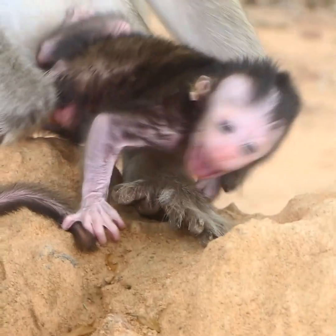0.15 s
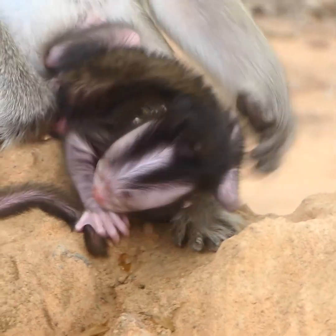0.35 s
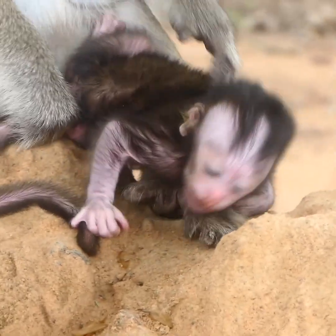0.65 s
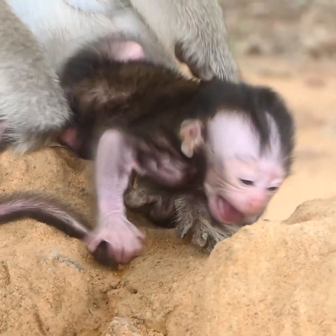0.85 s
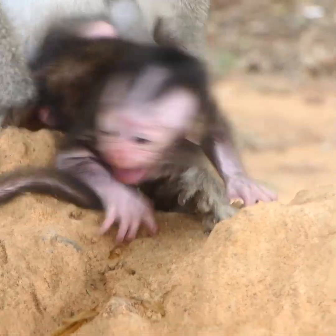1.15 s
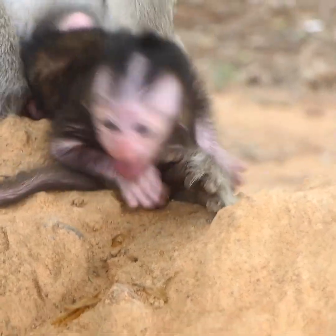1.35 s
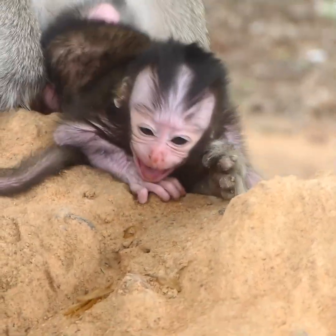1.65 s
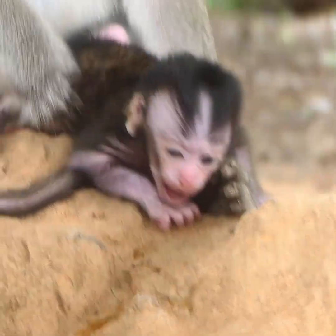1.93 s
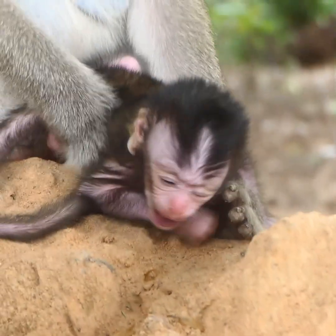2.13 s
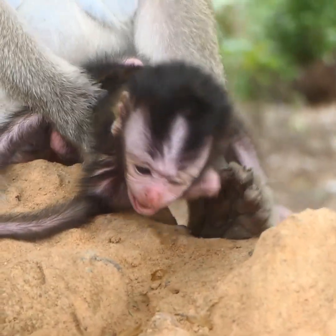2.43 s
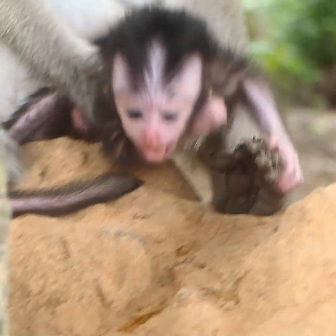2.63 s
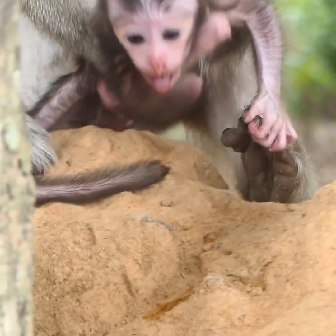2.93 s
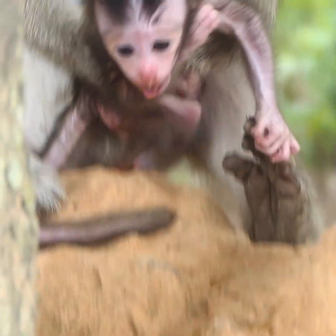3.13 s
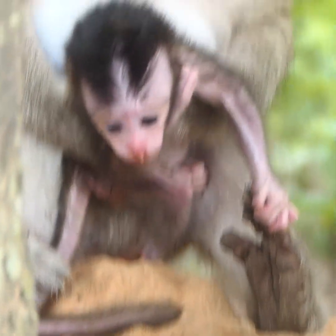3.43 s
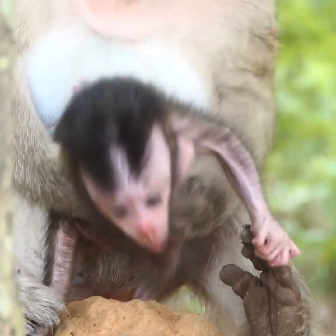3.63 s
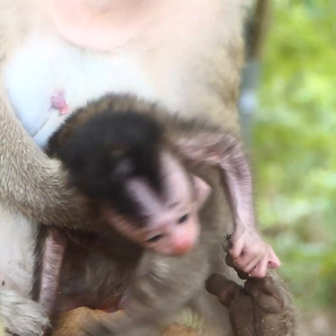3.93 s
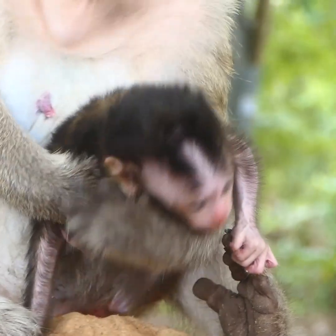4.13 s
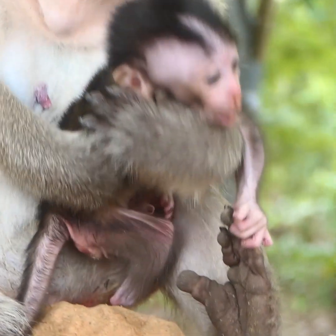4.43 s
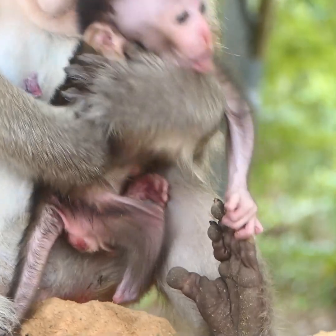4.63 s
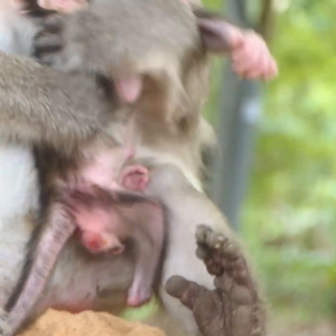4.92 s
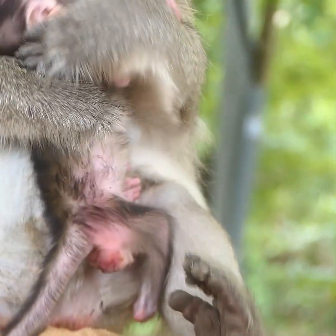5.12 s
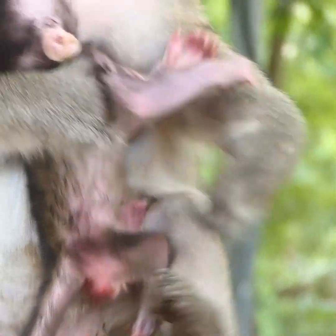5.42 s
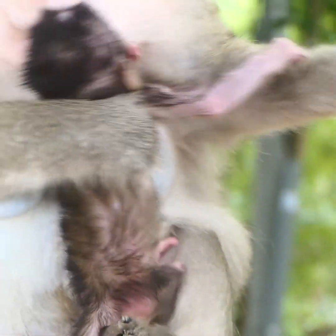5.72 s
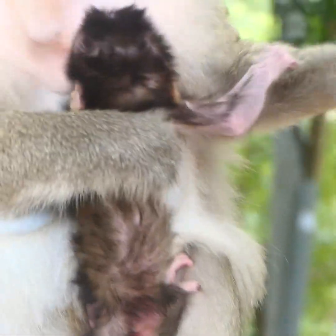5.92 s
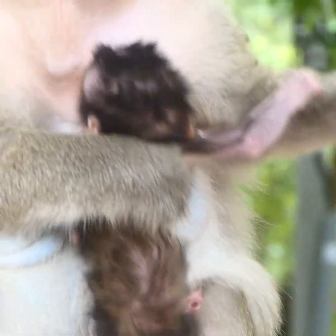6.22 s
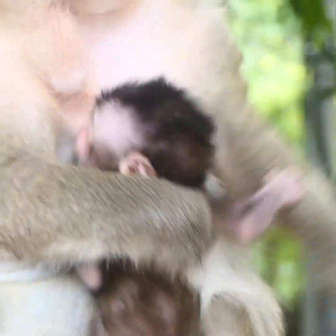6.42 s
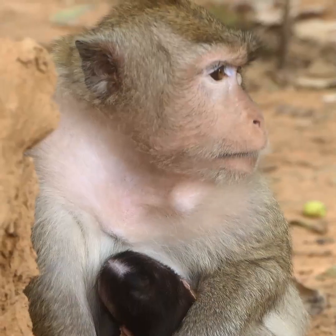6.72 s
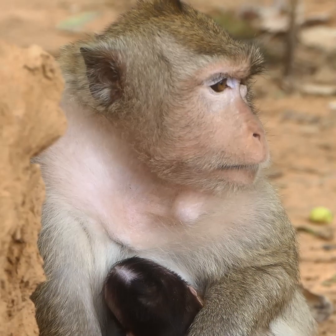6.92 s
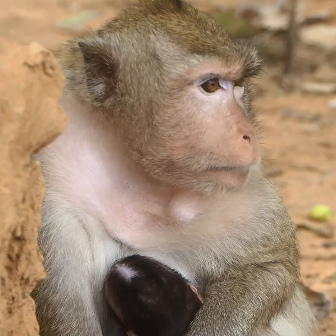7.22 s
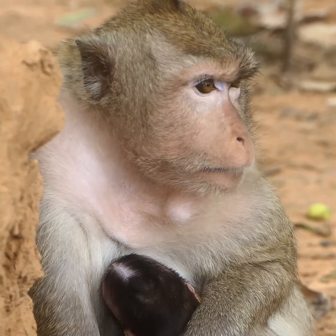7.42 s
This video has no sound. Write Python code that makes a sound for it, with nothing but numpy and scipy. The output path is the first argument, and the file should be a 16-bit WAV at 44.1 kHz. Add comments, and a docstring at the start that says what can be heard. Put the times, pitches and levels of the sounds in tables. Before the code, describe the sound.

A baby monkey shrieks close by, outdoors, right from the start: a very high whistle that cracks into rasp and lasts about half a second. A second, longer shriek runs from about 1 to 1.8 seconds. The third, from about 2.5 to 2.9 seconds, splits into several tones and slides steeply down. Behind the cries, much quieter, a distant one-cylinder engine chugs slowly with a dull thump, loose clatter and faint hiss. It swells between 3 and 4.5 seconds, then recedes and slows slightly. Near 5.4 seconds a monkey gives one soft huff, followed by faint scuffs of fur until about 6 seconds. At 6.6 seconds everything cuts to silence. Just before 6.9 seconds the engine returns, faster and brighter, and fades until the end at around 7.7 seconds.

```python
"""A baby macaque shrieks three times close by, outdoors: a very high whistle from its vocal folds that breaks
into rasp and, in the last cry, splits into side tones. Far off, a slow one-cylinder engine chugs as each firing
rings its exhaust. A short huff and some scuffs follow as the baby is gathered up. After a moment of silence the
scene changes: an engine runs faster and brighter, fading away."""
import sys
import numpy as np
from scipy import signal
from scipy.fft import rfft, irfft
from scipy.io import wavfile
from scipy.ndimage import uniform_filter1d, minimum_filter1d

SR = 44100
rng = np.random.default_rng(int(sys.argv[2]) if len(sys.argv) > 2 else 0)


def wav_record(signal):
    """Record a signal, one row per channel, as 16-bit PCM in the file named by sys.argv[1]."""
    frames = np.transpose(np.atleast_2d(signal))
    bounded = np.clip(frames, -1, 1)
    # unit amplitude maps onto the largest positive 16-bit level
    quanta = np.round(bounded * 32767).astype(np.int16)
    wavfile.write(sys.argv[1], SR, quanta)


N = 333396
TIME = np.arange(N) / SR
FREQ = np.maximum(np.fft.rfftfreq(2 * N, 1 / SR), 1)
SILENCE_START_S, SILENCE_END_S = 6.61, 6.873
CRACKS_PER_S = 220  # how often a rough voice jumps in pitch


def amp(db):
    """Turn decibels into a number to multiply by."""
    return 10 ** (np.asarray(db) / 20)


def unit(x):
    """Scale a sound to an average power of 1."""
    return x / np.sqrt(np.mean(x ** 2))


def curves(table):
    """One curve for each column after time, joining the rows with straight lines."""
    times, *columns = np.transpose(table)
    return [np.interp(TIME, times, column) for column in columns]


def shape(x, response):
    """Turn each frequency up or down; the result has power 1."""
    return unit(irfft(rfft(x, 2 * N) * response)[..., :N])


def colour(x, points):
    """Shape a sound by (frequency [Hz], level [dB]) points, falling away beyond both ends."""
    hz, db = np.transpose(points)
    gain = amp(np.interp(np.log(FREQ), np.log(hz), db))
    return shape(x, gain * np.minimum(FREQ / hz[0], 1) ** 3 * np.minimum(hz[-1] / FREQ, 1) ** 6)


def ring(x, modes):
    """Pass a sound through resonances: the pitches at which a hollow space likes to ring."""
    response = sum(amp(db) / (1 + 1j * (FREQ / hz - hz / FREQ) * hz / width) ** 2
                   for hz, width, db in modes)
    return shape(x, response)


def low_pass(x, hz):
    """Cut the treble steeply above hz."""
    return signal.sosfilt(signal.ellip(12, .2, 70, hz, fs=SR, output="sos"), x)


def wander(hz):
    """A smooth random wobble of size about 1, mostly slower than hz."""
    smoothing = signal.butter(2, min(hz, SR / 3), fs=SR, output="sos")
    return unit(signal.sosfilt(smoothing, rng.standard_normal(N)))


def jumps(hz):
    """A random value that jumps about hz times a second."""
    return rng.standard_normal(N)[np.cumsum(rng.random(N) < hz / SR)]


def turns(hz):
    """How far a vibration has turned so far (its phase), in radians."""
    return 2 * np.pi * np.cumsum(hz) / SR


def band(hz, width):
    """A narrow band of noise around a pitch that may move."""
    smoothing = signal.butter(3, width / 2, fs=SR, output="sos")
    a, b = signal.sosfilt(smoothing, rng.standard_normal((2, N)))
    phase = turns(hz)
    return unit(a * np.sin(phase) + b * np.cos(phase))


def wide_noise(side):
    """Noise for two ears; a larger side makes them less alike."""
    mid, apart = rng.standard_normal((2, N))
    return np.array([mid + side * apart, mid - side * apart])


def swells(source, table):
    """Smooth rises and falls of a sound, each in its own band."""
    return sum(ring(source, [(hz, width, 0)]) * amp(db) * np.exp(-((TIME - peak) / length) ** 2)
               for peak, length, db, hz, width in table)


def envelope(start, end, attack_s=.014, release_s=.024):
    """Fade one call in, hold it, and fade it out."""
    return np.clip(np.minimum((TIME - start) / attack_s, (end - TIME) / release_s), 0, 1)


def outdoors(x, echo_s, wet_db):
    """Add thin echoes from ground and trees, different at each ear."""
    t = TIME[:SR // 2]
    tail = rng.standard_normal((2, len(t))) * amp(-60 * t / echo_s) * (t > .003)
    tail /= np.sqrt(np.sum(tail ** 2, axis=1, keepdims=True))
    return x + amp(wet_db) * signal.fftconvolve(np.atleast_2d(x), tail, axes=1)[:, :N]


def monkey():
    """Vocal folds whistle; pushed harder they shake unevenly, so the pitch cracks and the voice rasps."""
    # the course of each cry: (time [s], pitch [Hz], roughness [0-1])
    first_cry = [(-.02, 5510, 0.6), (.03, 6130, 0.86), (.06, 6405, .5), (.074, 7390, .62),
                 (.118, 7900, .48), (.15, 7596, 0.54), (.2, 8050, 0.48), (.25, 8020, 0.66),
                 (.285, 8270, 0.45), (.31, 8200, 0.2), (.333, 7790, .42), (.337, 5470, .72),
                 (.372, 5870, 0.7), (.392, 7150, .62), (.411, 6680, 0.3), (.42, 6490, 1.22),
                 (.442, 5450, 0.88), (.49, 7070, 0.9), (.528, 6370, 1.11)]
    second_cry = [(0.977, 6545, 0.43), (0.99, 5800, 0.11), (1.001, 6150, 0.19), (1.008, 6770, 0.52),
                  (1.03, 6424, 0.83), (1.053, 8230, 0.51), (1.103, 8410, 0.43), (1.154, 7820, 0.11),
                  (1.174, 7720, 0.45), (1.217, 6900, 0.39), (1.226, 8150, 0.2), (1.258, 8540, 0.51),
                  (1.284, 8450, 0.89), (1.39, 8550, 0.94), (1.422, 8300, 0.5), (1.46, 8000, 0.46),
                  (1.501, 7640, 0.57), (1.56, 6950, .36), (1.578, 7530, 0.28), (1.592, 7360, 0.46),
                  (1.611, 7960, 0.1), (1.632, 7260, 0.45), (1.664, 6850, 0.25), (1.712, 6900, 0.36),
                  (1.737, 7600, 0.36), (1.762, 6620, 0.11), (1.783, 5050, 0.44)]
    last_cry = [(2.558, 5066, 0.07), (2.596, 5156, 0.057), (2.609, 5530, 0.27), (2.624, 5166, 0.1),
                (2.656, 5840, .08), (2.686, 5950, .14), (2.706, 5134, .28), (2.736, 5180, 0.099),
                (2.748, 4665, 0.42), (2.762, 4600, 0.52), (2.771, 4600, 0.14), (2.784, 4500, 0.18),
                (2.791, 4428, .5), (2.803, 4378, 0.14), (2.83, 4187, .14), (2.847, 3750, 0.47),
                (2.863, 2810, 0.53), (2.878, 2380, 0.32), (2.891, 2320, .4)]
    # how hard the baby pushes: (time [s], level [dB])
    effort = [(0, -33), (.24, -33), (.315, -28.5), (.36, -36), (.405, -31.5), (.46, -37.5), (.53, -35.5),
              (.99, -31.5), (1.03, -31), (1.1, -35.5), (1.15, -30), (1.22, -28), (1.32, -36), (1.42, -29.5),
              (1.52, -31), (1.67, -26.5), (1.728, -34.5), (1.755, -21.5), (1.785, -25), (2.56, -30),
              (2.62, -30.5), (2.65, -25.5), (2.75, -25.5), (2.88, -25.5)]
    hz, rough = curves(first_cry + second_cry + last_cry)
    rough = np.clip(rough * (1 + .2 * wander(45)), .01, 1)
    effort_db, = curves(effort)
    sounding = sum(envelope(cry[0][0], cry[-1][0]) for cry in (first_cry, second_cry, last_cry))
    flutter_db = 1.6 * (1 - rough) * wander(70)
    loudness = sounding * amp(effort_db + flutter_db)
    waver = .004 * wander(120)
    cracks = rough * (.03 * wander(600) + .05 * jumps(CRACKS_PER_S) * rough ** .5)
    phase = turns(hz * (1 + waver + cracks))
    whistle = np.sqrt(2) * (np.sin(phase) + side_tones(phase, rough)) * amp(4 * rough * wander(250))
    smear = band(hz * (1 + .05 * rough * wander(70)), width=800)  # uneven cycles blur the pitch
    tone = np.maximum(1 - 1.35 * rough ** 2, 0) * whistle + .62 * rough * smear
    strain_db = .014 * np.maximum(hz - 8250, 0)  # the voice thins at the top of its range
    voice = tone * amp(-strain_db) + .5 * rasp(hz, rough)
    cries = steady_lungs(voice * bursts(rough)) * loudness + thin_whistles()
    near = outdoors(cries, echo_s=.047, wet_db=-7.5)
    trees = outdoors(cries, echo_s=.54, wet_db=-15.5) - cries
    return (near + trees) * amp([[-.2], [.2]])  # a touch louder on the right


def rasp(hz, rough):
    """Swirling air rings the drifting resonances of throat and mouth, now one and now another the most."""
    # throat and mouth resonances: (centre [Hz], width [Hz], level [dB], exponent on roughness)
    throat = [(2910, 420, -5, 2.2), (5365, 790, 0, 1.6), (6240, 820, -2.5, 1.28), (7100, 1100, -0.5, 1.4),
              (8220, 670, -5, 1.8), (8580, 700, -7, 0.93)]
    # one more comes and goes as the mouth moves: (time [s], centre [Hz], level [dB])
    mouth = [(0, 3910, -4), (.12, 4020, -11), (.22, 3750, -10), (.29, 3730, -20), (.38, 3907, -3),
             (.48, 4150, -4.5), (1.04, 4184, -13), (1.2, 3900, -14.5), (1.32, 4185, -4), (1.4, 4195, 2),
             (1.48, 4265, 3.5), (1.54, 4446, -8.5), (1.6, 4700, -24), (1.78, 4500, -22), (2.75, 3869, 2)]
    mouth_hz, mouth_db = curves(mouth)
    air = amp(-11.5) * rough ** 2 * ring(rng.standard_normal(N), [(5800, 3000, 0)])
    for centre, width, db, exponent in throat + [(mouth_hz, 940, mouth_db, .96)]:
        reach = np.minimum(1, 1.4 * hz / centre) ** 3  # resonances far above the pitch get little energy
        drift, shift_db = 1 + .022 * wander(14), 2.2 * wander(22)
        air = air + band(centre * drift, width) * amp(db + shift_db) * rough ** exponent * reach
    return air


def bursts(rough, rate_hz=400):
    """A rough voice comes in rapid, uneven bursts, each starting sharply and fading."""
    cycle = np.cumsum(rate_hz * np.exp(.35 * jumps(rate_hz))) / SR
    fade_db = 13 * rough * (cycle % 1)
    return uniform_filter1d(amp(-fade_db), size=16)


def steady_lungs(x, window_s=.021):
    """Steady pressure from the lungs keeps the power of the voice even."""
    return x / np.sqrt(uniform_filter1d(x ** 2, size=int(window_s * SR)) + 1e-9)


def slow_engine():
    """Distant firings ring the exhaust; the moving parts clatter loosely in step with them."""
    # engine speed: (time [s], firing rate [Hz])
    speed = [(0, 25.38), (1.9, 25.44), (3.15, 24.93), (3.45, 24.56), (4.04, 23.89), (5.02, 23.37),
             (6.6, 23.23)]
    # the engine grows and recedes: (time [s], rise and fall [dB], level of the low thump [dB])
    course = [(0, -13, -50.5), (1.8, -9, -51.5), (2.4, -3, -46), (3.2, -1, -45), (3.8, -0.5, -40),
              (4.6, -0.5, -45.5), (5.5, -6.5, -45.5), (6.6, -9.5, -46)]
    # its other parts, by name: (base level [dB], share of the rise and fall it follows [0-1])
    parts = {"boom": (-49, 0.69), "pipe": (-50, 1), "clatter": (-43, 0.67), "hiss": (-48, 0.83)}
    # exhaust resonances, low to high: (centre [Hz], width [Hz], relative level [dB])
    boom_modes = [(49.3, 4.2, 1), (70.3, 6, -13.5)]
    thump_modes = [(92.6, 60, 7), (125.6, 58.3, 7.5), (194, 40, -4)]
    pipe_modes = [(383.4, 43, 7.5), (444.3, 36, 11.5), (750, 240, -16.5)]
    # tone of the clatter and of the open-air hiss: (frequency [Hz], relative level [dB])
    clatter_tone = [(200, 5), (300, -3.5), (400, 0.5), (600, -3), (780, -0.5), (1050, -4.5), (1500, -5),
                    (2100, -8), (3000, -15)]
    hiss_tone = [(1500, -8.5), (2300, -2.5), (3600, -2), (4800, -5.5), (6200, -8), (7500, -17),
                 (9300, -29.5)]
    # swells of distant noise: (peak time [s], length [s], level [dB], centre [Hz], width [Hz])
    far_swells = [(2.421, 0.42, -50, 462, 60), (3.162, 0.21, -44, 950, 480), (3.787, 0.35, -43.5, 395, 80),
                  (3.822, 0.22, -44.5, 546, 128), (4.05, 0.26, -53.5, 200, 60),
                  (4.443, 0.42, -44.5, 726, 300), (4.297, 0.22, -51, 1950, 900)]
    hz, = curves(speed)
    engine_db, thump_db = curves(course)
    gain = {part: amp(db + share * engine_db) for part, (db, share) in parts.items()}
    blows, gush = firings(hz, scatter_db=1.3, gas=.36)
    boom = ring(blows, boom_modes) * gain["boom"]
    thump = ring(blows, thump_modes) * amp(thump_db)
    # from afar the higher resonances arrive smeared by echoes
    far = outdoors(blows, echo_s=.51, wet_db=-5) + .8 * wide_noise(.25)
    pipe = ring(far, pipe_modes) * gain["pipe"]
    rattle = wide_noise(.2) * (1 + .27 * gush) * amp(.75 * wander(10))
    clatter = colour(outdoors(rattle, echo_s=.095, wet_db=-3.5), clatter_tone) * gain["clatter"]
    hiss = colour(wide_noise(.39) * amp(.66 * wander(25)), hiss_tone) * gain["hiss"]
    return boom + thump + pipe + clatter + hiss + swells(wide_noise(.21), far_swells)


def firings(hz, scatter_db, gas, decay_cycles=.6):
    """Each firing is a pressure pulse and a gush of gas; returns their sound and the gush's strength."""
    cycle = np.cumsum(hz) / SR
    size = amp(scatter_db * wander(32))
    pulses = unit(np.diff(np.floor(cycle), prepend=0) * size)
    gush = unit(np.exp(-(cycle % 1) / decay_cycles) * size)
    return pulses + gas * gush * wide_noise(.36), gush


def thin_whistles():
    """Soft, gliding tones before, beside or after a cry; the rough ones blur into narrow noise."""
    # whistles: (start [s], length [s], pitch [Hz], glide [Hz/s], level [dB], roughness [0-1])
    glides = [(0.107, 0.16, 7180, -7500, -36.5, 0.62), (0.51, 0.064, 5970, -8000, -34, 0.4),
              (.548, 0.103, 5740, 2.5, -53, 0.7), (1.195, 0.068, 5184, -4.5, -37, 0.42),
              (1.288, 0.092, 5240, 305, -41, 0.88), (1.526, 0.061, 5220, 501.5, -34.5, 0.3),
              (1.634, 0.057, 5316, 1.5, -44, .4), (2.443, 0.14, 4767, 1100, -41.5, .06),
              (2.538, 0.028, 4980, 8999, -27, 0.08), (2.843, 0.043, 6650, -22000, -29, 0.34)]
    total = 0
    for start, length, hz, glide, db, rough in glides:
        pitch = (hz + glide * (TIME - start)) * (1 + .002 * wander(60) + .015 * rough * wander(150))
        tone = (1 - rough) * np.sqrt(2) * np.sin(turns(pitch)) + rough * band(pitch, width=600)
        total = total + unit(tone) * amp(db) * envelope(start, start + length, release_s=.059)
    return total * amp(.58 * wander(80))


def scuffs():
    """Small huffs, smacks and scuffs of fur: short swells of grainy noise."""
    # each swell: (peak time [s], length [s], level [dB], centre [Hz], width [Hz])
    touches = [(0.955, 0.0034, -39.5, 2690, 1515), (0.964, 0.011, -47.5, 6130, 2510),
               (5.537, 0.12, -49.5, 3394, 1400), (5.562, 0.014, -44, 2850, 600),
               (5.564, 0.021, -52, 5870, 696), (5.933, 0.0039, -52, 6000, 1410)]
    return swells(wide_noise(.3) * amp(2.2 * wander(150)), touches)


def side_tones(phase, rough):
    """Mainly in the last cry, a second, slower vibration adds tones above and below the whistle."""
    # the second vibration: (time [s], rate [Hz], depth [0-1])
    second_voice = [(2.603, 1055, 0.04), (2.611, 1091, 0.28), (2.632, 1357, 0.22), (2.68, 1590, 0.48),
                    (2.71, 1646, 0.14), (2.733, 1267, 0.37), (2.753, 950, 0.95), (2.78, 1078, 0.8),
                    (2.81, 1042, 0.4), (2.845, 780, 0.3), (2.865, 705.6, 0)]
    # its tones: (distance from the pitch [multiples of that rate], level [dB])
    neighbours = [(-2, -19), (-1, -4), (1, -6), (2, -14), (3, -18.5)]
    rate, depth = curves(second_voice)
    beat = turns(rate * (1 + .015 * wander(600) + .6 * rough ** 2 * jumps(CRACKS_PER_S)))
    tones = sum(amp(db + 2.5 * wander(70)) * np.sin(phase + round(k) * beat) for k, db in neighbours)
    creak = .44 * depth * wander(210) * np.sin(phase)  # it also makes the whistle flutter
    leaking_air = amp(-24) * np.sqrt(depth) * ring(rng.standard_normal(N), [(7960, 4500, 0)])
    return depth * amp(2 * rough) * tones + creak + leaking_air


def huff(peak_s=5.366, length_s=.031, level_db=-34.5):
    """One soft, round puff of air through a monkey's throat."""
    # throat resonances: (centre [Hz], width [Hz], relative level [dB])
    throat = [(1160, 290, -8), (1385, 320, 0), (1650, 110, -2), (2730, 610, -14), (5940, 580, -21)]
    return ring(wide_noise(.58), throat) * amp(level_db) * np.exp(-((TIME - peak_s) / length_s) ** 2)


def fast_engine(start_hz=30.28, slowing_hz_per_s=.3):
    """Quicker firings ring the exhaust under a brighter clatter, and both fade away."""
    # exhaust resonances: (centre [Hz], width [Hz], relative level [dB])
    thump_modes = [(165, 200, 0), (182, 24, -5), (272, 16, -2)]
    # tone of the clatter and hiss: (frequency [Hz], relative level [dB])
    clatter_tone = [(130, 7), (400, 1), (600, -10.5), (870, 1), (1080, -1.5), (1250, 1.5), (1700, -7.5),
                    (3200, -6.5), (4800, -13.5), (7000, -17), (9800, -17.5), (12000, -25), (15000, -39)]
    elapsed = np.maximum(TIME - SILENCE_END_S, 0)
    blows, gush = firings(start_hz - slowing_hz_per_s * elapsed, scatter_db=.5, gas=.2)
    thump = ring(blows, thump_modes) * amp(-37 - 10.5 * elapsed)
    clatter = colour(wide_noise(.46) * (1 + .13 * gush), clatter_tone) * amp(-36.5 - 9 * elapsed)
    return thump + clatter


def scene():
    """Cries over the slow engine with the top treble cut, a silence, then a second scene with a faster engine."""
    opening = low_pass(monkey() + slow_engine() + huff() + scuffs(), hz=9500)
    return opening * (TIME < SILENCE_START_S) + fast_engine() * (TIME > SILENCE_END_S)


def record(dry, ceiling_db=-22, recovery_s=.47):
    """Gain control turns everything down at loud peaks and recovers slowly; the highest treble is cut."""
    peak = np.maximum(np.abs(dry).max(axis=0), amp(ceiling_db))
    over_db = 20 * np.log10(peak) - ceiling_db
    recovery = np.exp(-TIME / recovery_s)
    cut_db = np.maximum.accumulate(over_db / recovery) * recovery  # each cut lingers, then eases off
    gain = uniform_filter1d(minimum_filter1d(amp(-cut_db), size=130), size=130)
    return low_pass(dry * gain, hz=15200)


dry = scene()
out = record(dry)
wav_record(out)
```